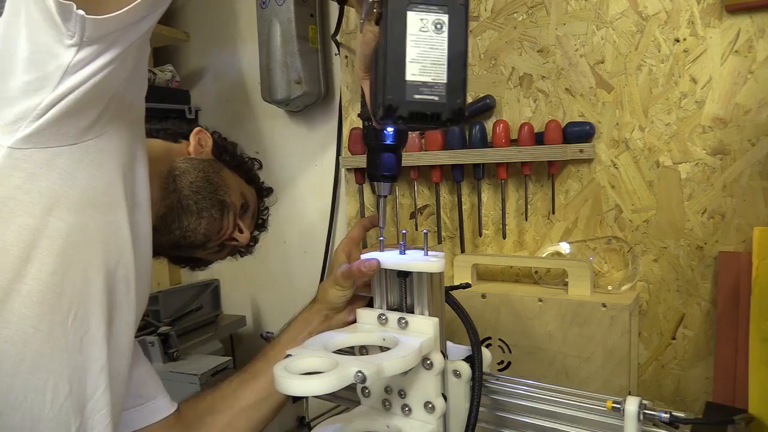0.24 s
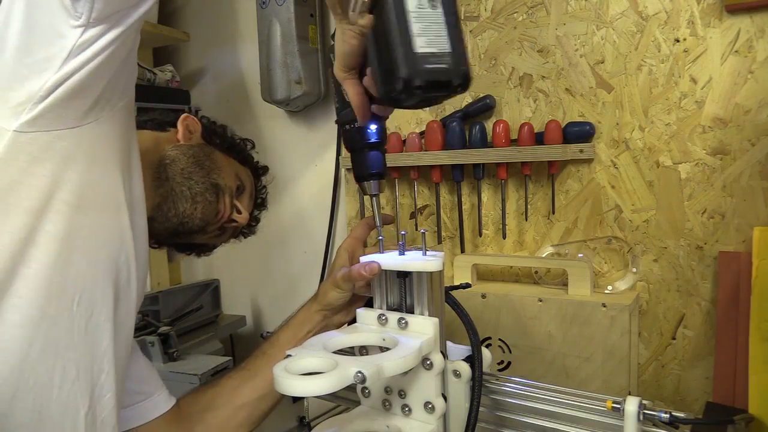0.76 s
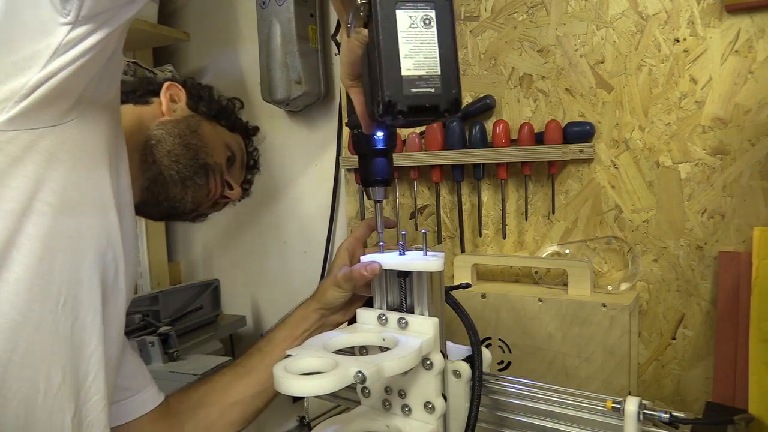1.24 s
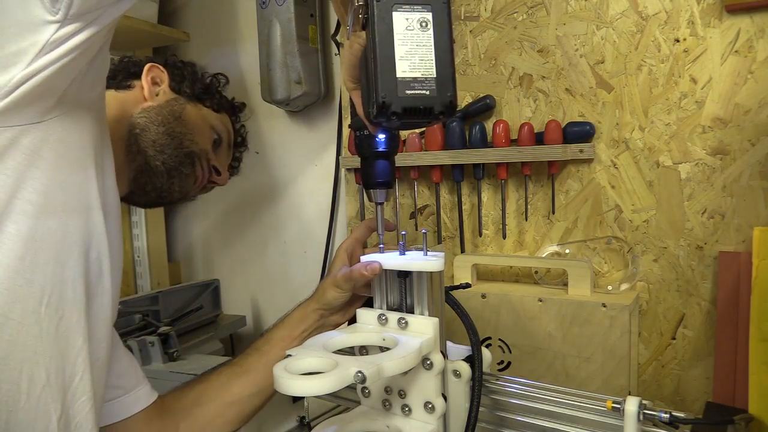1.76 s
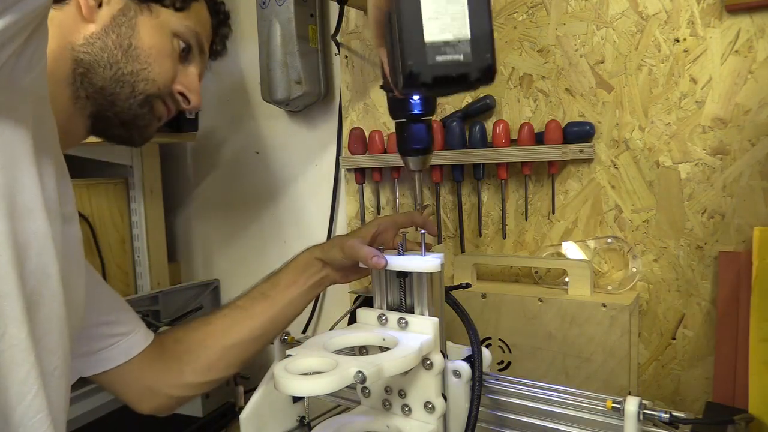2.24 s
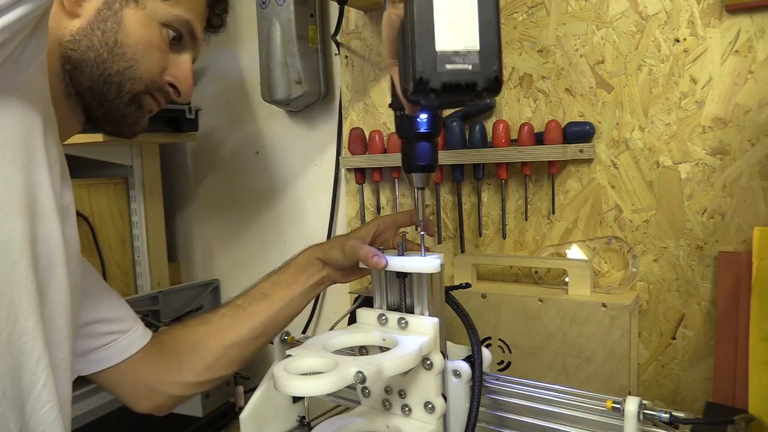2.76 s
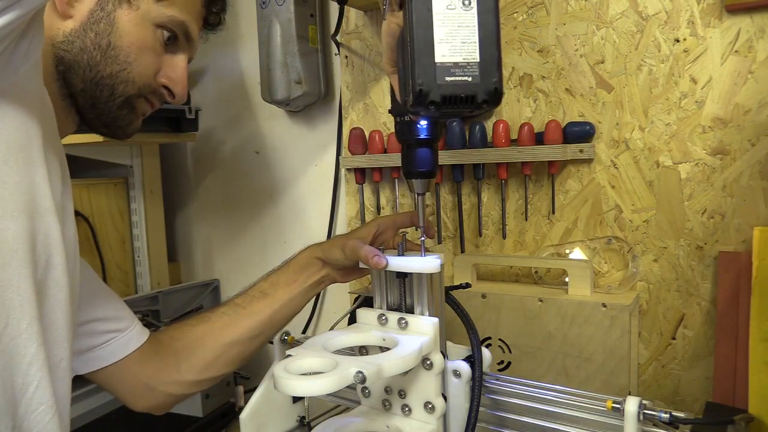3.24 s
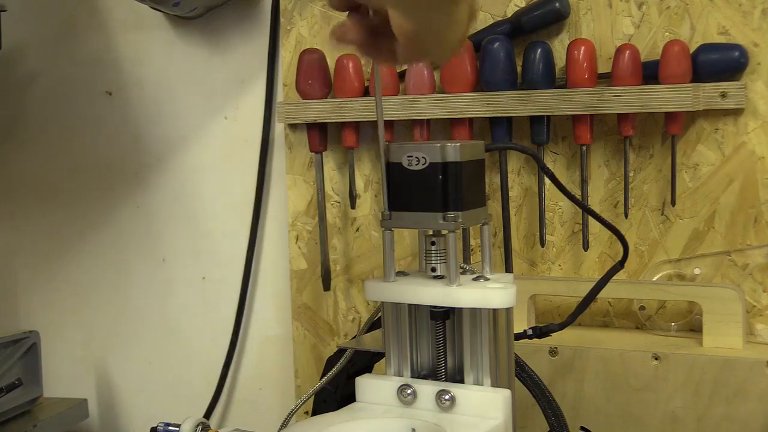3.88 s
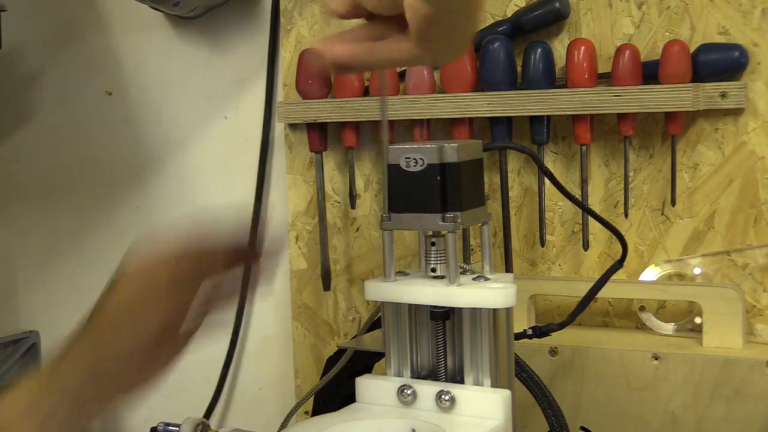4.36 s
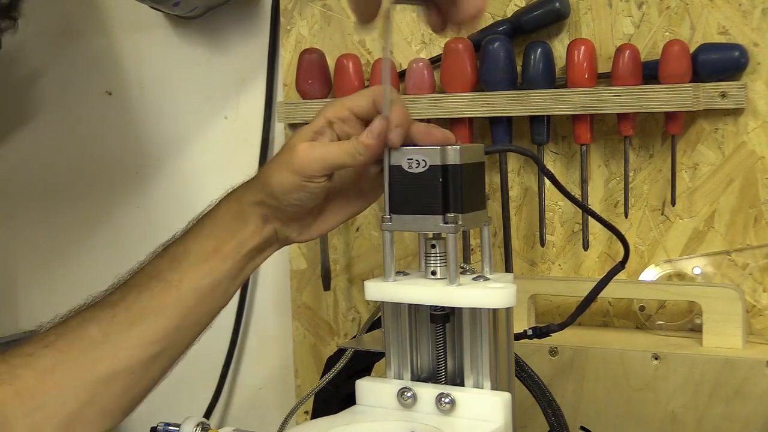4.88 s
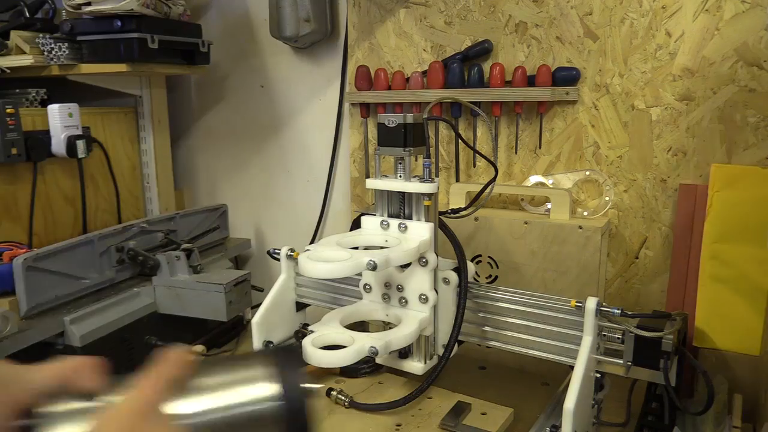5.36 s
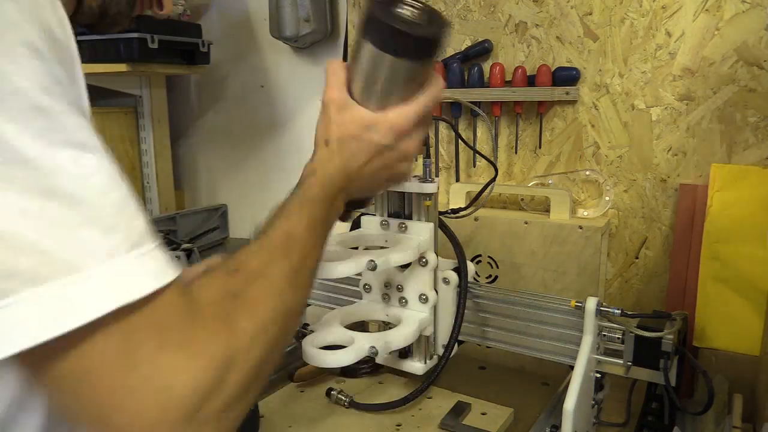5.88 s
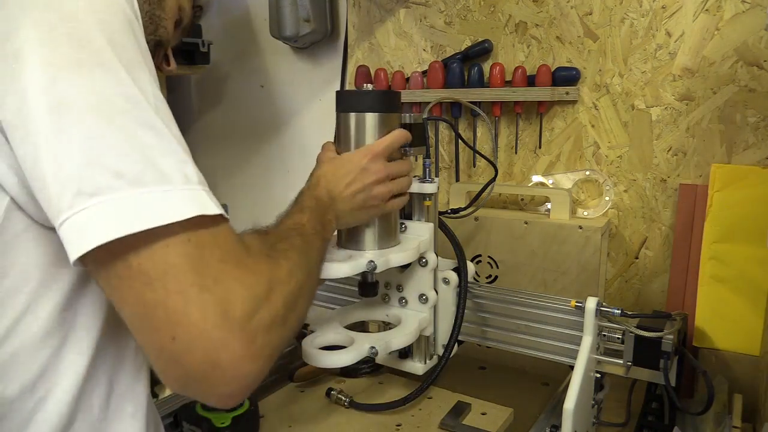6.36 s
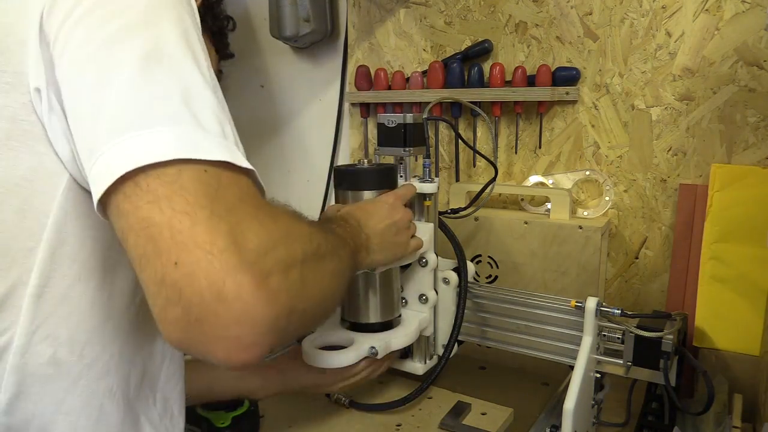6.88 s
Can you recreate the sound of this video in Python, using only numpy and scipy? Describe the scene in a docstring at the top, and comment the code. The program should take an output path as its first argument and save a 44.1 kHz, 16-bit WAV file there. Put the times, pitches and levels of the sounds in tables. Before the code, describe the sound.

A close mono pickup in a small workshop with quick wall reflections, faint air and hum. Soft handling opens, with a small steel tick at 0.27 s. Sharp ticks around 0.5 s lead into four abrupt cordless drill blips at about 0.55, 0.8, 0.95 and 1.1 s, each whining up, chirping and braking. From 1.25 to 2.1 s the drill runs slowly, with rattling gears and gentle hiss. Ticks and small knocks fill 2.1-2.6 s; a short squeeze at 2.63 s with clatter jumps into a blip until 2.95 s. From 3.0 s a run starts slowly, then climbs to a high bright whine, stopping around 3.7 s. Quiet rubbing, hex-key ticks and light knocks occupy 3.8-5.2 s. A brief scrape comes at 5.45 s. From 6.05 s a heavy spindle bumps the frame, with strong thuds near 6.28 and 6.62 s, slow scraping strokes and a last dull knock at 7.0 s.

```python
"""A cordless drill drives screws in a workshop as a small router is assembled: four blips, a slow run, a short
squeeze that jumps into a blip, and a run that speeds up. Its motor turns drive whining tones, rattle and hiss.
Steel ticks are short noise cracks. A hex key ticks and scrapes in a screw, and a heavy spindle is
picked up and knocked into its clamp: noise and decaying modes ring the frame, and slow strokes rub and scrape.
Close walls answer over faint air and hum; the sound is mono."""
import sys
import numpy as np
from scipy import signal
from scipy.fft import rfft, irfft, next_fast_len
from scipy.io import wavfile
from scipy.ndimage import map_coordinates

SR = 44100
rng = np.random.default_rng(int(sys.argv[2]) if len(sys.argv) > 2 else 0)


def inscribe(sig):
    """Save sig as 16-bit PCM at rate SR to the path in sys.argv[1].

    A 1-D sig is mono; a 2-D sig holds one channel per row.
    Samples are clipped to [-1, 1] before scaling.
    """
    pcm = np.round(np.clip(np.atleast_2d(sig).T, -1, 1) * 32767)
    wavfile.write(sys.argv[1], SR, pcm.astype(np.int16))


N = 313992
TOP_HZ = 16000  # band limit of the whole scene


def amp(db):
    """Decibels to gain."""
    return 10 ** (np.asarray(db) / 20)


def unit(x):
    """Scale to rms 1."""
    return x / np.sqrt(np.mean(x ** 2) + 1e-20)


def along(points, hz):
    """Read (Hz, value) points along a log frequency axis."""
    f, v = np.transpose(points)
    return np.interp(np.log(hz + 1), np.log(f + 1), v)


def curve(points):
    """Join (s, value) points into one value per sample."""
    s, value = np.transpose(points)
    return np.interp(np.arange(N) / SR, s, value)


def wobble(rate):
    """A smooth random curve with rate knots a second."""
    knots = rng.standard_normal(int(N * rate / SR) + 4)
    return map_coordinates(knots, [np.arange(N) * rate / SR])


def ease(start_s, length_s):
    """A smooth step from 0 to 1."""
    u = np.clip((np.arange(N) / SR - start_s) / length_s, 0, 1)
    return u * u * (3 - 2 * u)


def coloured(x, spectrum, resonances=()):
    """Causal minimum-phase filter with the given spectrum, lifted at each resonance."""
    m = 2 * next_fast_len(len(x) // 2 + 2048)
    hz = np.fft.rfftfreq(m, 1 / SR)
    db = along(spectrum, hz)
    for centre_hz, width_hz, lift_db in resonances:
        db = db + lift_db / (1 + (2 * (hz - centre_hz) / width_hz) ** 2)
    # folding the cepstrum forward in time makes the filter causal
    cepstrum = irfft(np.log(amp(db)), m)
    cepstrum[1:m // 2] *= 2
    cepstrum[m // 2 + 1:] = 0
    return irfft(rfft(x, m) * np.exp(rfft(cepstrum)), m)[:len(x)]


def gritty(rate, depth_db):
    """Noise that comes in small clumps."""
    return rng.standard_normal(N) * amp(depth_db * wobble(rate))


def add(track, s, sound):
    """Mix a sound into the track at s seconds."""
    part = track[max(round(s * SR), 0):][:len(sound)]
    part += sound[:len(part)]


TOOTH_ORDER = 3.943  # gear teeth met per motor turn
SPEED_JITTER = .8  # unsteadiness in turns per s, at and below the slow speed
SLOW_SPEED = 100  # turns per s at which pace is 1
SURGE_STRAIN_DB, BRAKE_STRAIN_DB = 6, 4.5  # lift of whine and hiss where a blip surges or brakes hardest
# resonances of the drill's housing: centre_hz [Hz], width_hz [Hz], lift_db [dB]
HOUSING = [(275.3, 59, 15.5), (568.7, 23, 6.5), (1029, 182, 12.5), (1892, 335, 13), (9100, 4100, 8.5)]


def drill():
    """One motor rotation drives whine, rattle, slap, hiss, squeal and chirp at the speed the trigger gives."""
    speed, level_db, hard, surge, brake = trigger()
    running = np.clip(speed / 30, 0, 1)
    pace = speed / SLOW_SPEED + 1e-6
    loose = 1 / np.maximum(pace, 1)  # slow gears run loosest
    turns = np.cumsum(speed + SPEED_JITTER * loose * wobble(90)) / SR
    strain = amp(SURGE_STRAIN_DB * surge + BRAKE_STRAIN_DB * brake)
    steady = strain * (motor_whine(turns, speed, hard, pace, loose) + brush_hiss(turns, pace))
    gears = gear_rattle(turns, pace) + gear_lash(surge, brake) + gear_chirp(turns, surge, brake)
    return running * amp(level_db) * (gears + current_squeal(speed, hard, pace, loose) + steady)


# gentle squeezes, held longer: pressed_s [s], released_s [s], ease_in_s [s], level_db [dB]
GENTLE_SQUEEZES = [(1.245, 2.084, .04, 0), (2.629, 2.791, 0.02, -3), (2.996, 3.68, .035, -1.5)]
# the speed that the finger asks for in each of them: time_s [s], motor_speed [turns per s]
ASKED_SPEEDS = [
    [(1.275, 70), (1.32, 84.5), (1.5, 96.5), (2.06, 99)],
    [(2.648, 70.5), (2.72, 95.5), (2.795, 99.5)],
    [(3.025, 88), (3.05, 98), (3.16, 104.5), (3.2, 123.5), (3.27, 178.5), (3.35, 233), (3.45, 268),
     (3.52, 279), (3.685, 290)],
]
# quick squeezes of the trigger: pressed_s [s], released_s [s], top_speed [turns per s], level_db [dB]
BLIPS = [(0.55, 0.641, 213, 1), (0.796, 0.865, 210, 1.5), (0.946, 1.008, 222, 2), (1.088, 1.159, 208, 2.5),
         (2.785, 2.906, 214, 1)]
TRIGGER_LAG_S, SPIN_UP_S, SPIN_UP_POWER = .007, .024, 1.5  # a blip's delay, time constant, steepness
BRAKE_S, COAST_DB = .052, -5.5  # time to stop; the level falls as the current is cut


def trigger():
    """Motor speed, level in dB, whether the squeeze is hard, and how hard a blip surges or brakes (0-1)."""
    t = np.arange(N) / SR
    speed, level_db, hard, surge, brake = np.zeros((5, N))
    squeezes = []
    for (pressed, released, ease_in, db), asked in zip(GENTLE_SQUEEZES, ASKED_SPEEDS):
        squeezes.append((ease(pressed, ease_in), released, curve(asked), db, 0))
    for pressed, released, top, db in BLIPS:
        since = np.maximum(t - pressed - TRIGGER_LAG_S, 0)
        up = 1 - np.exp(-(since / SPIN_UP_S) ** SPIN_UP_POWER)
        squeezes.append((up, released, top, db, 1))
    for up, released, asked, db, sudden in squeezes:
        down = ease(released, BRAKE_S)
        own = asked * up * (1 - down)
        # where squeezes overlap, the faster one rules
        level_db = np.where(own > speed, db + COAST_DB * down, level_db)
        hard = np.where(own > speed, sudden, hard)
        speed = np.maximum(speed, own)
        # 6.75 brings each hump's peak to 1
        surge = surge + sudden * 6.75 * up ** 2 * (1 - up)
        brake = brake + sudden * 6.75 * down * (1 - down) ** 2
    return speed, level_db, hard, surge, brake


# rotor, commutator, fan and gear teeth: order [cycles per motor turn], level_db [dB before whine colour]
ORDERS = [(3, -10), (5.9, -13), (7.89, -17), (10, -10), (11.83, -7), (19.25, -8), (27.6, -17), (31.54, -20),
          (39.4, -15), (48.3, -17), (86.7, -23)]
# gear teeth singing under a hard squeeze: order [cycles per motor turn], level_db [dB before whine colour]
LOADED_ORDERS = [(3.94, -14), (31.54, -10), (39.4, -20), (55.2, -17), (69, -19)]
# colour of the whine: frequency_hz [Hz], gain_db [dB]
WHINE_COLOUR = [(200, -18), (850, -1), (1200, -2), (1450, -8), (2300, -8), (2800, -3), (4500, 5),
                (7100, -3), (7950, 8), (8380, 13), (9100, 8), (10000, 4), (11200, 7)]
BUZZ_DB, WHINE_DB, WHINE_GROWS = -29, -35.5, 1.3  # gain per buzz overtone, whine gain, power of the pace


def motor_whine(turns, speed, hard, pace, loose):
    """Tones locked to the motor slide through the housing's fixed resonances."""
    buzz = np.zeros(N)
    # every overtone of the tooth rate buzzes
    for k in range(1, 22):
        order = k * TOOTH_ORDER
        buzz += np.sin(2 * np.pi * (order * turns + rng.random())) * (order * speed < TOP_HZ)
    throb = 1 + np.cos(2 * np.pi * turns + wobble(20))  # once per motor turn
    loaded = mesh(turns, speed, LOADED_ORDERS, 1)
    free = mesh(turns, speed, ORDERS, np.sqrt(loose))
    tones = np.where(hard, loaded, free) + amp(BUZZ_DB) * buzz * throb
    return amp(WHINE_DB) * pace ** WHINE_GROWS * coloured(tones, WHINE_COLOUR, HOUSING)


def mesh(turns, speed, orders, looseness):
    """Motor-locked tones; loose teeth never meet twice alike, so each flutters in level and phase."""
    tones = np.zeros(N)
    for order, db in orders:
        level = amp(db + 4 * looseness * wobble(70))
        phase = 2 * np.pi * order * turns + .7 * looseness * wobble(170)
        tones += level * np.sin(phase) * (order * speed < TOP_HZ)
    return tones


# colour of the rattle: frequency_hz [Hz], level_db [dB per Hz, relative]
RATTLE_COLOUR = [(60, -25), (200, -12.5), (400, -4.5), (1500, -4.5), (2400, -3.5), (9000, -34)]
GEAR_DB, GEAR_GROWS = -39.5, 0.54  # level at the slow speed, power of the pace
GEAR_RATIO, SWELL_DB, SWELL_AT_S = 16, 2, 1.82  # motor turns per chuck turn; depth and time of one swell


def gear_rattle(turns, pace):
    """Clumpy gear noise in the housing swells once per turn of the chuck."""
    chuck = np.cos(2 * np.pi * (turns - turns[round(SWELL_AT_S * SR)]) / GEAR_RATIO)
    noise = unit(coloured(gritty(500, depth_db=4.0), RATTLE_COLOUR, HOUSING))
    return amp(GEAR_DB + SWELL_DB * chuck) * pace ** GEAR_GROWS * noise


# colour of the slap: frequency_hz [Hz], level_db [dB per Hz, relative]
LASH_COLOUR = [(200, -8), (1400, -27.5), (1800, -5.5), (4500, -3.5), (12000, -8.5)]
SURGE_LASH_DB, BRAKE_LASH_DB = -24, -25.5


def gear_lash(surge, brake):
    """The gear teeth slap as a blip speeds up or brakes: noise bursts in the housing."""
    noise = unit(coloured(gritty(700, depth_db=2.0), LASH_COLOUR, HOUSING))
    return (amp(SURGE_LASH_DB) * surge ** 2 + amp(BRAKE_LASH_DB) * brake ** 2) * noise


# colour of the brush hiss: frequency_hz [Hz], level_db [dB per Hz, relative]
BRUSH_COLOUR = [(1200, -38.5), (2400, -8.5), (2900, 1.5), (4800, 5), (7000, -5.5), (8600, -2.5), (12000, 2),
                (16000, -8.5)]
HISS_DB, HISS_GROWS = -33, 1.0  # level at the slow speed before strain, power of the pace


def brush_hiss(turns, pace):
    """Sparking brushes hiss, pulsing at the tooth rate and growing with speed."""
    sparks = gritty(1100, depth_db=0.5) * (1 + np.cos(2 * np.pi * TOOTH_ORDER * turns) / 2)
    return amp(HISS_DB) * pace ** HISS_GROWS * unit(coloured(sparks, BRUSH_COLOUR))


def current_squeal(speed, hard, pace, loose):
    """The chopped motor current squeals in a narrow noise band while the motor picks up from rest."""
    pull = np.clip(np.gradient(speed) * SR / 5000, 0, 1)
    fade = 1 - np.clip(speed / 200, 0, 1)
    noise = unit(coloured(rng.standard_normal(N), [(7000, -27.5), (8500, 0), (10800, -34)]))
    return amp(-17.5) * pull * loose * pace * np.where(hard, 1, .5) * fade * noise


def gear_chirp(turns, surge, brake):
    """The third harmonic of the teeth chirps at the height of each blip's surge and stop."""
    tone = np.sin(2 * np.pi * 3 * TOOTH_ORDER * turns + wobble(300))
    return amp(-25) * (surge ** 10 + brake ** 10) * tone


# steel ticks, mostly tool tips touching screws, plus the drill's spindle lock clicking as it stops at 2.09 s:
# start_s [s], peak_db [dB], centre_hz [Hz]
TICKS = [(.269, -15.5, 8200), (0.2959, -25.5, 6000), (0.501, -16, 5170), (0.5095, -3, 8100),
         (0.567, -6.5, 4070), (.746, -19.5, 5830), (0.7617, -7, 9300), (0.815, -11, 3830),
         (2.092, -13.5, 7000), (2.3953, -14.5, 3030), (2.469, -35, 5130), (2.48, -34, 5160),
         (2.545, -25, 2970), (2.558, -28.5, 3000), (2.603, -30.5, 3440), (3.917, -28.5, 2800),
         (4.224, -33, 4500), (4.4383, -17, 9680), (4.628, -26, 3170), (4.885, -27.5, 11000),
         (5.147, -33.5, 1280), (6.198, -21, 4240), (6.6061, -7, 3920)]


def ticks():
    """Steel on steel: a sharp crack that rings briefly around each touch's own pitch."""
    out, t = np.zeros(N), np.arange(SR // 8) / SR
    for s, db, hz in TICKS:
        decay = amp(-60 * t / 0.017) + amp(-7.5 - 60 * t / 0.052)  # crack, then a weaker tail
        crack = rng.standard_normal(len(t)) * decay
        colour = [(300, -22), (hz / 2, -7), (hz, 0), (2 * hz, -9)]
        y = coloured(crack, colour, [(hz, hz / 4, 4)])
        add(out, s, amp(db) * y / np.abs(y).max())
    return out


# heavier contacts that shake the frame: start_s [s], thud_db, ring_db, clatter_db [dB before layer trims],
# spot_hz [Hz], the frame's strongest answer at that spot
KNOCKS = [(0.584, -29, -18.5, -45, 990), (2.108, -39, -36.5, -37, 258), (2.395, -32.5, -27.5, -42, 1004),
          (2.544, -34.5, -29, -51, 1172), (2.66, -27, -25.5, -21.5, 260), (2.68, -25, -20, -21.5, 1030),
          (3.495, -32.5, -43, -42, 240), (3.81, -38.5, -42, -49, 257), (4.192, -38, -44, -63, 450),
          (4.443, -31.5, -32, -34, 617), (4.58, -37, -39, -41.5, 345), (4.713, -42, -40, -44, 610),
          (4.843, -33.5, -35, -33, 243), (5.226, -37, -43, -47.5, 290), (5.431, -38, -45, -29, 300),
          (6.048, -33, -36.5, -35, 605), (6.135, -31, -31.5, -32.5, 281), (6.198, -29.5, -26, -30.5, 240),
          (6.263, -20.5, -20, -30.5, 220), (6.29, -18.5, -19.5, -25, 207), (6.48, -34, -34, -49, 310),
          (6.559, -36.5, -45, -76, 280), (6.607, -20.5, -17, -26, 199), (6.634, -19.5, -21.5, -23, 162),
          (6.719, -39, -34.5, -32, 303), (6.743, -33.5, -42, -52, 267), (6.829, -34, -48, -36.5, 243),
          (6.922, -40.5, -56, -53, 261), (7.019, -21.5, -30, -32.5, 270)]
# modes of the frame before each blow's spread: pitch_hz [Hz], level_db [dB before colour], t60_s [s]
FRAME_MODES = [(150, -10, 0.19), (234, -3, 0.02), (263, -5, 0.067), (459.6, -6, 0.096), (579, -4.5, 0.1),
               (850, -18, 0.059), (2110, -8.5, 0.084), (2880, -6, 0.11), ]
# colours of a contact's thud, ring and clatter, each: frequency_hz [Hz], level_db [dB per Hz, relative]
THUD_COLOUR = [(30, -20), (120, -10.5), (220, 2), (600, -7), (2000, -65.5)]
RING_COLOUR = [(300, -21.5), (750, 3.5), (1200, 6), (3000, -11.5), (5000, -38)]
CLATTER_COLOUR = [(1500, -34.5), (3000, -0.5), (4500, 4.5), (8500, 0), (16000, -3.5)]
SPOT_LIFT_DB = 9.5  # how much a knock favours the resonance of the spot it strikes


def knocks():
    """Each blow rings the frame's modes at new strengths while loose parts chatter briefly."""
    out, t = np.zeros(N), np.arange(SR // 3) / SR
    rise = 1 - np.exp(-t / 0.0016)
    for s, thud_db, ring_db, clatter_db, spot_hz in KNOCKS:
        spot = [(spot_hz, spot_hz / 7, SPOT_LIFT_DB)]
        modes = np.zeros(len(t))
        for hz, db, t60 in FRAME_MODES:
            level = amp(db + rng.normal(0, 2.56) - 60 * t / t60)
            pitch = hz * (1 + rng.normal(0, 0.029))
            modes += level * np.sin(2 * np.pi * pitch * t + rng.uniform(0, 2 * np.pi))
        chatter = rng.standard_normal(len(t)) * amp(2.58 * wobble(496.6)[:len(t)])
        thud = blow(rise * (modes + 4 * chatter * amp(-60 * t / 0.13)), THUD_COLOUR, spot)
        ring = blow(rise * (modes + 3.5 * chatter * amp(-60 * t / 0.1)), RING_COLOUR, spot)
        clatter = blow(rise * (modes + 1.3 * chatter * amp(-60 * t / 0.099)), CLATTER_COLOUR)
        low = amp(thud_db - 2.5) * thud + amp(ring_db - 7.5) * ring
        add(out, s, low + amp(clatter_db - 5.0) * clatter)
    return out


def blow(x, spectrum, resonances=()):
    """Colour a contact and give it rms 1 over its first 20 ms."""
    y = coloured(x, spectrum, resonances)
    return y / np.sqrt(np.mean(y[:SR // 50] ** 2))


# hands, tools and parts sliding: peak_s [s], fade_s [s to fade by 20 dB], rub_db [dB], scrape_db [dB]
STROKES = [(0.07, 1.1, -52.5, -53.5), (2.22, 0.6, -53, -55.5), (3.79, 0.3, -52, -57),
           (4.15, 0.88, -49.5, -57), (4.65, 0.74, -45, -61), (4.885, 0.0146, -33.5, -44.5),
           (5.285, 1.1, -63, -56.5), (5.451, 0.0573, -38.5, -32), (6.37, 0.27, -42, -52.5),
           (6.75, 0.53, -41.5, -48)]
# colours of the low rub and the steel scrape, each: frequency_hz [Hz], level_db [dB per Hz, relative]
RUB_COLOUR = [(30, -24.5), (60, 8.5), (120, -4.5), (260, 6.5), (1400, -7), (3000, -36)]
SCRAPE_COLOUR = [(900, -42), (1800, -5), (4400, -0.5), (12000, -13.5), (16000, -18)]
RISE_SHARE = 0.36  # a stroke's rise time over its fade time


def handling():
    """Each stroke swells and fades; in it parts catch and bump the frame at changing spots, and steel scrapes."""
    t = np.arange(N) / SR
    rub, scrape = np.zeros((2, N))
    for s, fade_s, rub_db, scrape_db in STROKES:
        shape = amp(-20 * np.maximum(t - s, (s - t) / RISE_SHARE) / fade_s)
        rub += amp(rub_db) * shape
        scrape += amp(scrape_db) * shape
    bumps = sum(ringing(gritty(80, depth_db=8), t60=.05) for spot in range(4))
    catches = sum(ringing(gritty(110, depth_db=4), t60=.025) for spot in range(2))
    return rub * unit(coloured(bumps, RUB_COLOUR)) + scrape * unit(coloured(catches, SCRAPE_COLOUR))


def ringing(x, t60):
    """A stiff part with many close modes that all fall by 60 dB within t60 seconds."""
    t = np.arange(SR // 10) / SR
    return signal.fftconvolve(x, rng.standard_normal(len(t)) * amp(-60 * t / t60))[:len(x)]


# decay of the room: frequency_hz [Hz], t60_s [s]
WALLS = [(100, 0.67), (1000, 0.15), (14000, 0.14)]


def walls(x):
    """The small room answers quickly with decaying noise; the bass lingers longest."""
    hz, t, z = signal.stft(rng.standard_normal(SR // 2), SR, nperseg=256)
    decay = amp(-60 * t / along(WALLS, hz)[:, None])
    tail = signal.istft(z * decay, SR, nperseg=256)[1]
    delayed = np.pad(tail / np.linalg.norm(tail), (260, 0))  # 260 samples, about 6 ms
    return signal.fftconvolve(x, delayed)[:N]


# colour of the quiet workshop's rush: frequency_hz [Hz], level_db [dB per Hz, relative]
AIR_COLOUR = [(20, -30.5), (60, 1.5), (500, -10), (5000, -32.5), (16000, -37)]
# hum tones: pitch_hz [Hz], level_db [dB, around which it wavers]
HUM = [(335, -67.5), (501, -64)]


def workshop_air():
    """A faint rush of noise with a hum that wavers in level and phase."""
    t = np.arange(N) / SR
    hum = np.zeros(N)
    for hz, db in HUM:
        hum += amp(db + 1.3 * wobble(2.8)) * np.sin(2 * np.pi * hz * t + .5 * wobble(8.1))
    return hum + amp(-61.0) * unit(coloured(rng.standard_normal(N), AIR_COLOUR))


def scene():
    """Drill, ticks and knocks sound in the room over handling and air, the same in both channels."""
    motor, steel, frame = drill(), ticks(), knocks()
    room = walls(amp(-16.0) * motor + amp(-16.5) * steel + amp(-19.0) * frame)
    mono = motor + steel + frame + room + handling() + workshop_air()
    return np.array([mono, mono])


def record(dry):
    """Keep nothing at or above the band limit."""
    m = next_fast_len(N + 8192)
    passband = np.fft.rfftfreq(m, 1 / SR) < TOP_HZ
    return irfft(rfft(dry, m) * passband, m)[:, :N]


dry = scene()
out = record(dry)
inscribe(out)
```